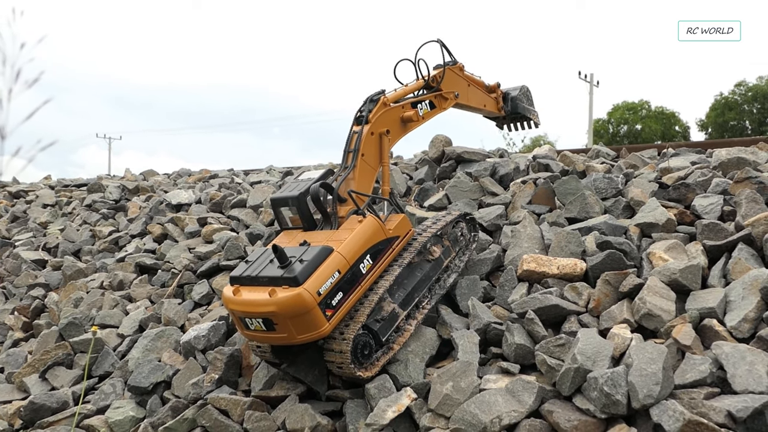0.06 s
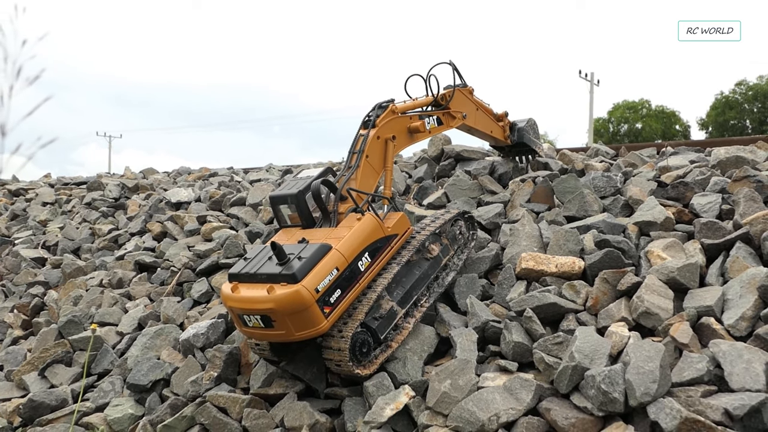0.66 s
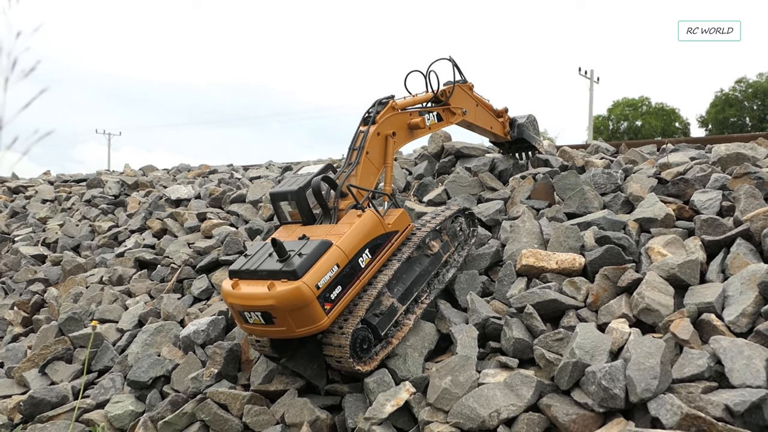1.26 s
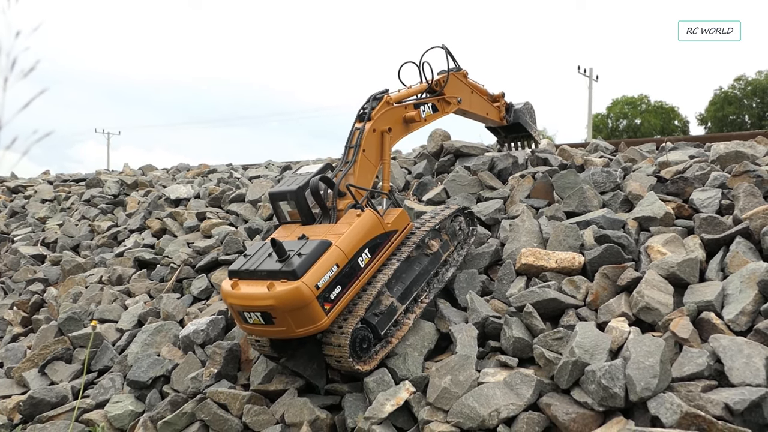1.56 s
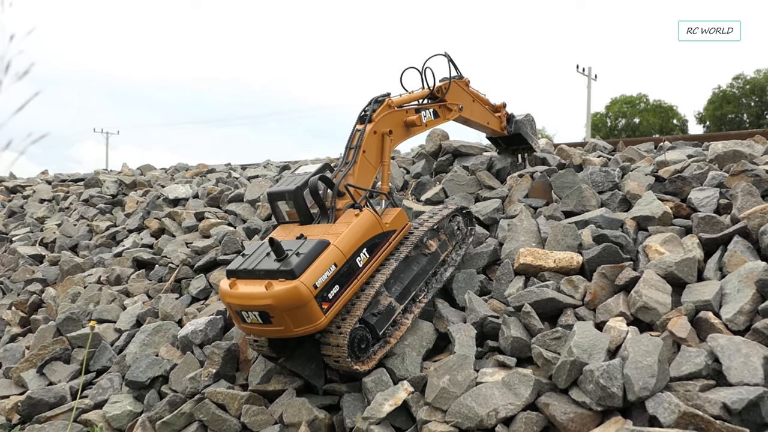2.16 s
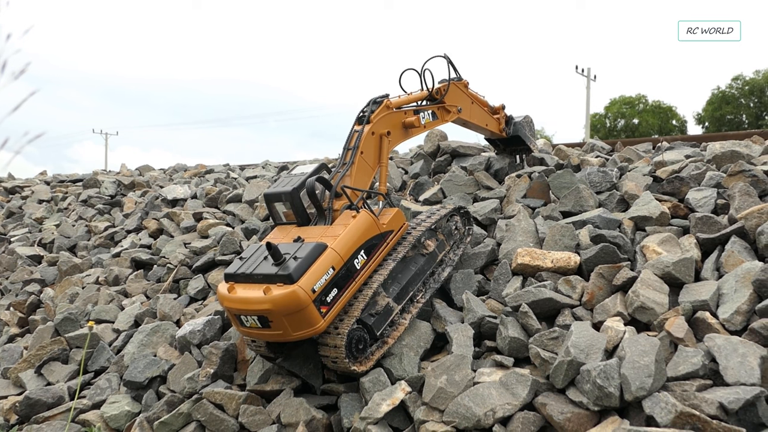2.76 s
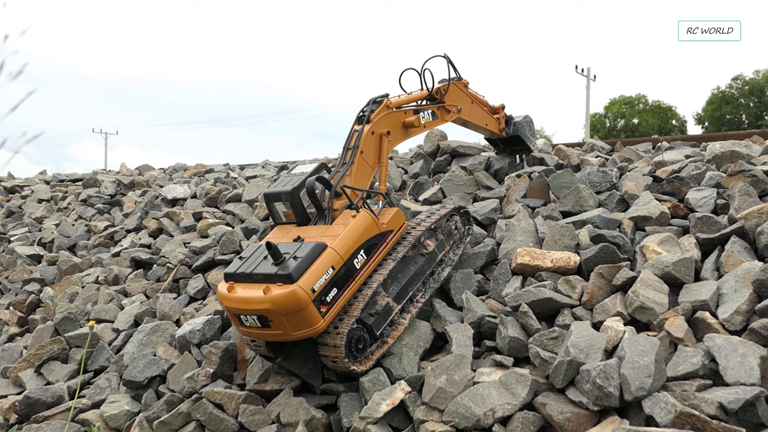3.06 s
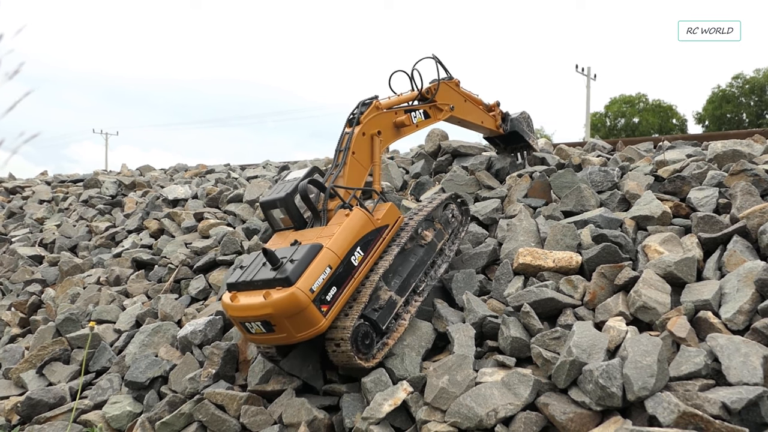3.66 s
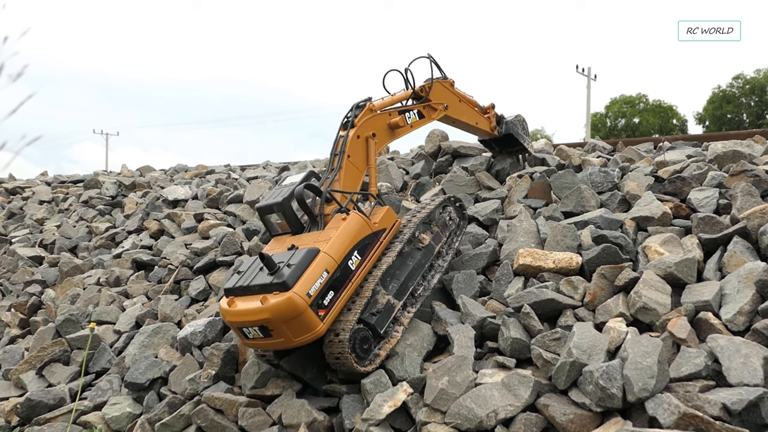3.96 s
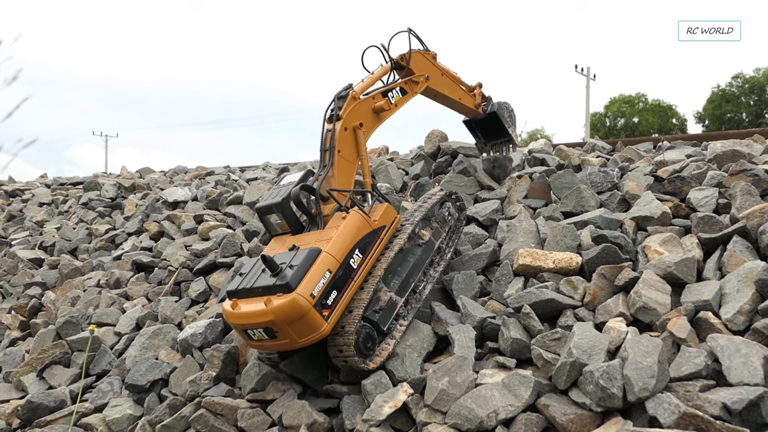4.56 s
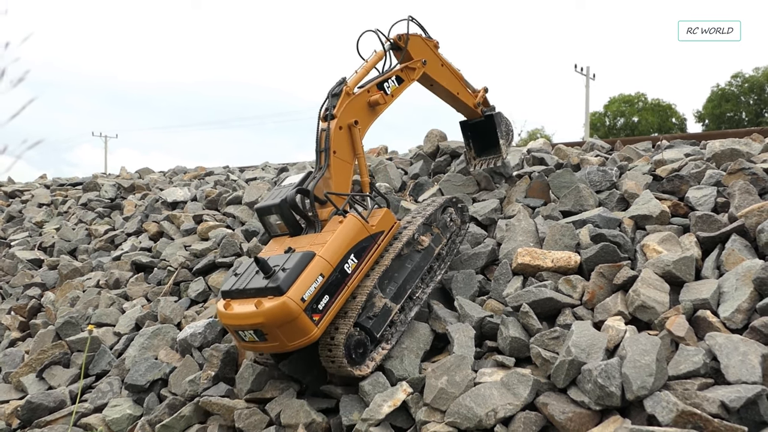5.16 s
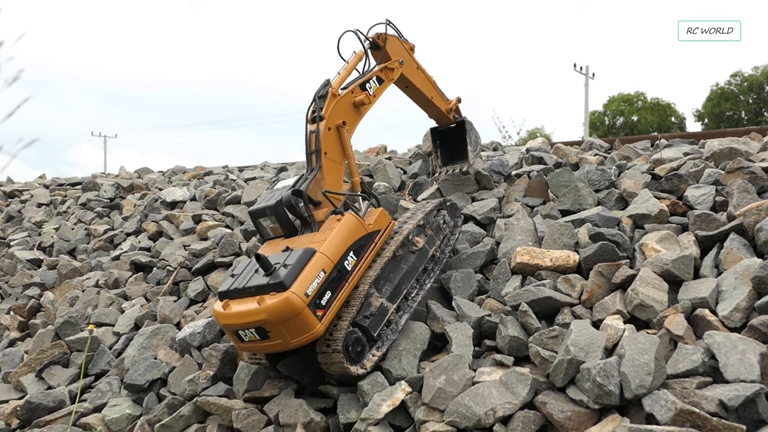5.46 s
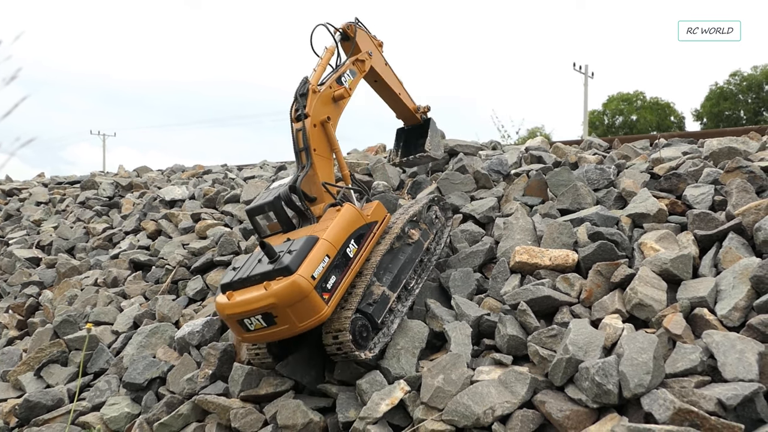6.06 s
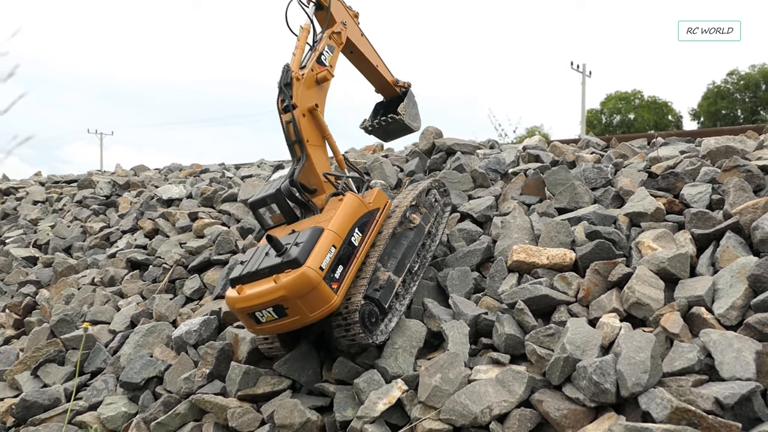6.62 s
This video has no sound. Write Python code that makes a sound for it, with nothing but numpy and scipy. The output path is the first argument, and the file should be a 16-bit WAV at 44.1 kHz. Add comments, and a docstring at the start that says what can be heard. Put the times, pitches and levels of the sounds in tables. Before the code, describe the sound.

A radio-controlled toy digger works on loose stones outdoors, close to the microphone. Its small arm motor whirs with a smooth hum and gear rattle until about 0.7 seconds, stopping with a light metallic ping. A rougher motor burst comes from 1.3 to 1.6 seconds, and another smooth whir from 2 to 2.6. Dry clicks and knocks fall between, clearest near 2.3 and 3.2 seconds. At 3.3 seconds the track motors start with a higher whine and bright rattle. From 3.9 the lifting motor joins with a hoarse growl and thin metallic scrape, both running until about 6.8 seconds. Track links clatter unevenly over the stones, a loose steel part pings between 4 and 5 seconds, and sharp cracks stand out at 4.8, 5.4 and 5.8. Behind are a soft distant traffic rumble, light wind puffs and, in the first three seconds, faint bird chirps and thin whistles.

```python
"""A radio-controlled toy digger climbs a bank of loose stones outdoors, close to the microphone.
Its arm and boom (the big lifting beam) move in three short bursts; then both track motors start and
the boom joins them. Each motor hums as its shaft spins and rattles as its gear teeth strike.
Track links clatter, joints and stones knock, and a loose steel part pings.
Behind it are faint whistles, small far-off birds, puffs of wind and distant traffic."""
import sys
import numpy as np
from scipy import signal
from scipy.fft import rfft, irfft, next_fast_len
from scipy.io import wavfile
from scipy.ndimage import uniform_filter1d, map_coordinates

SR = 44100
rng = np.random.default_rng(int(sys.argv[2]) if len(sys.argv) > 2 else 0)


def wav_record(signal):
    """Record a signal, one row per channel, as 16-bit PCM in the file named by sys.argv[1]."""
    frames = np.transpose(np.atleast_2d(signal))
    bounded = np.clip(frames, -1, 1)
    # unit amplitude maps onto the largest positive 16-bit level
    quanta = np.round(bounded * 32767).astype(np.int16)
    wavfile.write(sys.argv[1], SR, quanta)


N = 299439
T = np.arange(N) / SR


def amp(db):
    """Turn decibels into a number to multiply a sound by."""
    return 10 ** (np.asarray(db) / 20)


def unit(x):
    """Scale a signal to an average strength (rms) of 1."""
    return x / np.sqrt(np.mean(x ** 2))


def switch(start_s, end_s, soften_samples=90):
    """A gate: 1 between two times and 0 outside, with soft edges."""
    return uniform_filter1d(((T >= start_s) & (T <= end_s)) * 1., size=soften_samples)


def curves(rows):
    """Give a gate that is open while the rows last, then each column joined by straight lines."""
    times, *columns = np.transpose(rows)
    return [switch(times[0], times[-1])] + [np.interp(T, times, column) for column in columns]


def swells(rows):
    """A smooth rise and fall for each row of middle_s, length_s, level_db."""
    return sum(amp(db) * np.exp(-(2 * (T - middle_s) / length_s) ** 2) for middle_s, length_s, db in rows)


def die_away(t, ring_s):
    """A fade that drops 60 dB in ring_s seconds."""
    return np.exp(-np.log(1000) * t / ring_s)


def gain_at(hz, tone):
    """Read the gain at any pitch from a tone curve: rows of pitch_hz, level_db."""
    pitches, levels = np.transpose(tone)
    return amp(np.interp(np.log(hz + 1), np.log(pitches), levels))


def colour(x, tone):
    """Make each pitch in a sound louder or softer to follow a tone curve."""
    size = next_fast_len(N + SR // 10)
    return irfft(rfft(x, size) * gain_at(np.fft.rfftfreq(size, 1 / SR), tone), size)[:N]


def band(x, hz, width_hz):
    """Let through the sound near one pitch, as a ringing object does."""
    return signal.lfilter(*signal.iirpeak(min(hz, SR / 2 - 1), hz / min(width_hz, SR / 4), fs=SR), x)


def resonate(x, notes):
    """Ring several notes at once: rows of pitch_hz, width_hz, level_db."""
    return sum(amp(db) * band(x, hz, width_hz) for hz, width_hz, db in notes)


def wander(per_s):
    """A smooth random wobble of typical size 1 that changes about per_s times a second."""
    steps = rng.standard_normal(N // 20)[:int(N / SR * per_s) + 2]
    return unit(map_coordinates(steps, [T * per_s], order=2, mode="nearest"))


def add(out, start_s, sound):
    """Mix a short sound in at its start time."""
    i = max(int(start_s * SR), 0)
    out[i:i + len(sound)] += sound[:N - i]


# The tone of open air with far traffic: pitch_hz, relative_db
AIR_TONE = [(25, -36), (60, -23.5), (95, -3.5), (124, 1), (160, -4), (230, -8), (400, -9.5), (800, -17),
            (1400, -24), (3200, -29), (6500, -34.5), (9000, -38.5), (15000, -47)]
def air(level_db=-44.5, waver_db=0.97, side_db=-1.0):
    """Open air and far traffic make a wide, softly wavering rumble."""
    middle, side = (unit(colour(rng.standard_normal(N), AIR_TONE))
                    * amp(level_db + waver_db * wander(4.5)) for _ in range(2))
    return middle + amp(side_db) * np.array([side, -side])


# Puffs of wind: middle_s, length_s, level_db
GUSTS = [(.33, 0.6, -42), (3.802, 0.37, -38), (4.002, 0.28, -45), (6.13, 0.25, -41), (6.63, .2, -41)]
def breeze():
    """Wind rumbles on the left and right microphone openings separately."""
    tone = [(25, -42), (80, 1), (170, 3.5), (300, -7), (700, -27), (3000, -60)]
    return swells(GUSTS) * np.array([unit(colour(rng.standard_normal(N), tone)) for _ in range(2)])


# Bird chirps: start_s, length_s, start_hz, end_hz, relative_db
CHIRPS = [(.765, 0.02, 3600, 2600, -40), (0.811, 0.034, 3600, 2580, -43), (0.793, 0.026, 5200, 7150, -44),
          (1.74, 0.039, 5900, 7100, -46), (1.825, 0.036, 5500, 6700, -47), (1.91, 0.036, 5900, 6600, -45),
          (2.87, .03, 6700, 7400, -53), (2.954, 0.032, 5400, 7000, -43), (3, 0.092, 6450, 6250, -49)]
def birds(waver=0.03, gain_db=-7):
    """Small far-off birds sing thin, gliding chirps with a quick quaver."""
    out = np.zeros(N)
    quaver = 1 + waver * wander(250)
    for start_s, length_s, start_hz, end_hz, db in CHIRPS:
        glide_hz = np.linspace(start_hz, end_hz, int(length_s * SR))
        hz = glide_hz * np.roll(quaver, -int(start_s * SR))[:len(glide_hz)]
        chirp = np.hanning(len(hz)) * np.sin(2 * np.pi * np.cumsum(hz) / SR)
        add(out, start_s, amp(db + gain_db) * chirp)
    return out


# Thin whistles: start_s, end_s, pitch_hz, level_db
WHISTLES = [(0, .7, 14298, -63), (1.29, 1.68, 14298, -55), (2.03, 2.2, 14298, -54), (2.75, 2.87, 1520, -61),
            (3.08, 3.23, 1520, -57)]
def whistles():
    """Faint, steady tones fade in and out."""
    return sum(amp(db) * switch(start_s, end_s, soften_samples=2000) * np.sin(2 * np.pi * hz * T)
               for start_s, end_s, hz, db in WHISTLES)


# How strongly the stones bounce sound sideways: pitch_hz, gain_db
STONE_SCATTER = [(200, -10), (350, -25), (430, -25), (650, -9), (1000, -12), (1600, -19), (2500, -17),
                 (3400, -10), (5600, -17), (15000, -16)]
def stone_echoes(x, decay_s=0.0068, drift_rad=1.6):
    """Many tiny echoes off the stones make the digger sound wide; they shift as it rocks."""
    t = T[:SR // 20]
    echoes = rfft(rng.standard_normal(len(t)) * np.exp(-t / decay_s), 2 * N)
    smeared = irfft(rfft(x, 2 * N) * echoes / np.abs(echoes))[:N]  # changes timing, not tone
    side = colour(smeared, STONE_SCATTER)
    drift = np.exp(1j * drift_rad * wander(8))
    side = np.real(signal.hilbert(side, next_fast_len(N))[:N] * drift)
    return x + np.array([side, -side])


# The notes of a loose steel part: pitch_hz, relative_db, ring_s
STEEL_NOTES = [(1333, 5, 0.32), (2939, -27, 0.34), (3680, -25, 0.36)]
# Jolts that shake it: start_s, gain_db
JOLTS = [(0.728, -29.5), (1.633, -44), (2.266, -28.5), (4.05, -26.5), (4.34, -29), (4.8, -28)]
def steel_pings():
    """Each jolt makes the loose steel part tick and ring with the same notes."""
    out, t = np.zeros(N), T[:SR // 2]
    ring = sum(amp(db) * np.sin(2 * np.pi * hz * t) * die_away(t, ring_s)
               for hz, db, ring_s in STEEL_NOTES)
    tick = amp(-19) * band(rng.standard_normal(len(t)), 2000, 3000) * np.exp(-t / 0.0038)
    for start_s, db in JOLTS:
        add(out, start_s, amp(db) * (ring + tick))
    return out


# Knocks of joints and stones: start_s, peak_db, pitch_hz, ring_s
KNOCKS = [(1.251, -34, 1800, 0.039), (1.74, -35.5, 2780, .02), (1.81, -40.5, 750, 0.022),
          (1.993, -35.5, 3040, .02), (1.994, -27.5, 1010, 0.034), (2.267, -18, 1240, 0.029),
          (2.809, -40, 2400, .03), (3.077, -36, 2870, 0.026), (3.219, -22.5, 820, 0.025),
          (3.22, -30, 5000, 0.017), (3.2502, -25, 4700, 0.011), (3.2502, -18.5, 3160, 0.022),
          (3.329, -36, 4970, .04), (4.785, -9, 4158, 0.034), (4.848, -23, 2464, 0.016),
          (5.3793, -8, 2180, 0.014), (5.774, -7.5, 2815, 0.02)]
def knocks(snap_db=-17):
    """Joints and stones give short, dry cracks: a bright snap plus a body with its own pitch."""
    out, t = np.zeros(N), T[:SR // 10]
    for start_s, peak_db, hz, ring_s in KNOCKS:
        blow = rng.standard_normal(len(t)) * die_away(t, ring_s)
        body = band(blow, hz, width_hz=.4 * hz)
        snap = band(band(blow, 2400, 3300), 2400, 3300)
        crack = body + amp(snap_db) * snap
        add(out, start_s, amp(peak_db) * crack / np.abs(crack).max())
    return out


# Notes that the track links ring in the hollow body: pitch_hz, width_hz, relative_db
LINK_NOTES = [(343, 24, -15), (491, 70, 6), (529, 55, -2.5)]
# Louder clatter as the tracks lurch over a stone: middle_s, length_s, level_db
LURCHES = [(3.77, .16, -37), (3.9, 0.05, -40), (4.03, 0.078, -40), (4.29, 0.071, -31.5), (4.65, .09, -35.5),
           (4.82, 0.18, -33), (5.08, 0.17, -34), (5.37, 0.059, -37), (5.53, 0.15, -32.5), (5.72, 0.13, -34),
           (5.93, 0.048, -43), (6.1, .08, -35)]
def track_links(blows_per_s=260, crawl_db=-43.5):
    """Track links drop on the stones at random and knock in the digger's hollow body."""
    gate, *_ = motor_run(TRACK_RUNS[0], TRACK_LOADS[0], **TRACK_START_STOP)
    blows = (rng.random(N) < blows_per_s / SR) * np.sign(rng.standard_normal(N))
    tone = [(150, -0.5), (310, 4), (560, -8.0), (700, -15), (2000, -30)]
    knocking = colour(resonate(blows, LINK_NOTES), tone)
    return gate * (amp(crawl_db) + swells(LURCHES)) * unit(knocking)


def panels(x, decay_s=0.0095, ring_db=-7):
    """The plastic and metal panels ring on briefly with countless weak notes."""
    t = T[:SR // 12]
    ring = rng.standard_normal(len(t)) * np.exp(-t / decay_s)
    return x + amp(ring_db) * signal.fftconvolve(x, ring / np.linalg.norm(ring))[:N]


# Notes of the shell that every gearbox rings: pitch_hz, width_hz, gain_db
SHELL_NOTES = [(735, 89, 4), (1427, 67, -2), (1726, 190, 1), (1977, 80, 1), (2362, 55, -2.5),
               (2735, 28, -18), (2950, 88, -9), (4600, 76, -13), (4530, 100, -11), (5370, 83, -4),
               (5740, 40, -28), (6100, 81, -4.5), (6490, 190, -4.5), (7670, 175, -1), (9400, 260, -5.5),
               (10480, 220, -8), (11400, 390, -1.5), (12400, 400, -2.5), (13800, 500, -5)]
def gear_rattle(shaft_hz, tone, uneven_db, swing_db, chatter_db, slide_db, teeth=16):
    """Each gear tooth strikes with its own force, then slides; the shell and panels ring along."""
    turns = np.cumsum(shaft_hz * (1 + .02 * wander(400))) / SR
    tooth_meets = np.diff(np.floor(teeth * turns), prepend=0)
    strikes = tooth_meets * rng.standard_normal(N) * amp(uneven_db * rng.standard_normal(N))
    strikes /= np.sqrt(teeth * shaft_hz / SR)  # slow teeth strike seldom but hard
    force = unit(strikes) + amp(slide_db) * rng.standard_normal(N)
    # The force swings with each turn and chatters because the teeth have some slack.
    force *= amp(swing_db * np.sin(2 * np.pi * turns) + chatter_db * wander(130))
    ringing = panels(force + resonate(force, SHELL_NOTES))
    return unit(colour(ringing, tone))


# How well the digger's body gives off a motor tone: pitch_hz, gain_db
BODY_TONE = [(100, -38), (220, -27), (265, -13), (330, -7), (430, 3), (560, 2), (690, -6.5), (780, 14.5),
             (930, 0.5), (1050, -1.5), (3000, -18.5)]
def motor_hum(shaft_hz, harmonics, flutter, rough_db):
    """An off-balance rotor with three magnetic poles shakes the body at multiples of its speed."""
    turns = np.cumsum(shaft_hz * (1 + flutter * wander(70))) / SR
    return sum(amp(db + rough_db * wander(50)) * gain_at(multiple * shaft_hz, BODY_TONE)
               * np.sin(2 * np.pi * multiple * turns) for multiple, db in harmonics)


def motor_run(run, load, spin_up_s, ease, brake_s, slow_hum_db, slow_gear_db, kick_db, fade_db_per_s):
    """A motor speeds up, bears its load and brakes. Gives gate, shaft_hz, hum_db and rattle_db."""
    kick_s, run_down_s, slowest_share, rattle_db_per_hz = 0.013, 0.1, .1, 0.0922
    on_s, off_s, first_db, last_db = run
    _, full_hz, hum_db = curves(load)
    slowed_hz = np.mean(np.transpose(load)[1]) - full_hz
    # A load that slows the shaft presses the teeth harder.
    rattle_db = np.interp(T, [on_s, off_s], [first_db, last_db]) + rattle_db_per_hz * slowed_hz
    lag = np.exp(-(np.maximum(T - on_s, 0) / spin_up_s) ** ease)  # ease 1 is full push at once
    since_off_s = np.clip(T - off_s, 0, run_down_s)
    speed_share = np.maximum((1 - lag) * (1 - since_off_s / brake_s), slowest_share)
    jolt_db = kick_db * np.minimum(since_off_s / kick_s, 1)  # braking teeth cross their slack
    fade_db = fade_db_per_s * np.maximum(since_off_s - kick_s, 0)
    hum_db = hum_db + slow_hum_db * lag - fade_db
    rattle_db = rattle_db + slow_gear_db * lag + jolt_db - fade_db
    return switch(on_s, off_s + run_down_s), full_hz * speed_share, hum_db, rattle_db


def geared_motor(runs, loads, start_stop, harmonics, gear_tone, flutter, rough_db, **gear_settings):
    """A motor hums and rattles its gearbox during each of its runs."""
    each_run = np.array([motor_run(run, load, **start_stop) for run, load in zip(runs, loads)])
    gates, *columns = each_run.swapaxes(0, 1)
    current_run = np.argmax(gates, axis=0)
    shaft_hz, hum_db, rattle_db = (np.choose(current_run, column) for column in columns)
    hum = np.sqrt(2) * amp(hum_db) * motor_hum(shaft_hz, harmonics, flutter, rough_db)
    rattle = amp(rattle_db) * gear_rattle(shaft_hz, gear_tone, **gear_settings)
    return gates.sum(axis=0) * (hum + rattle)


# The scrape of the gears, moving with the strain: time_s, pitch_hz, level_db
GEAR_STRAIN = [(3.87, 4936, -36), (4.51, 4710, -39), (5.14, 5100, -36), (5.6, 4867, -41), (6.79, 4700, -40)]
def straining_gears(width_hz=330):
    """Hard-pressed teeth scrape with a narrow, metallic hiss."""
    gate, hz, db = curves(GEAR_STRAIN)
    noise = rng.standard_normal(N) + 1j * rng.standard_normal(N)
    slow_noise = signal.sosfilt(signal.butter(2, width_hz / 2, fs=SR, output="sos"), noise)
    scrape = np.real(slow_noise * np.exp(2j * np.pi * np.cumsum(hz) / SR))  # lifted to its pitch
    return gate * amp(db) * unit(scrape)


def boom_shudder(gain_db=-5):
    """In the boom's first run, slack in its screw drive rattles the body's low notes."""
    gate, _, hum_db, _ = motor_run(BOOM_RUNS[0], BOOM_LOADS[0], **BOOM_START_STOP)
    shake = resonate(rng.standard_normal(N), [(372.5, 16, -0.14), (466, 10.0, -0.86)])
    return gate * amp(hum_db + gain_db) * unit(band(shake, 360, 220))


def boom_hoarseness(gain_db=-3):
    """As the boom heaves the digger along, its motor rocks in its mount and the hum turns hoarse."""
    gate, shaft_hz, hum_db, _ = motor_run(BOOM_RUNS[1], BOOM_LOADS[1], **BOOM_START_STOP)
    phase = 2 * np.pi * np.cumsum(shaft_hz) / SR
    rocking = wander(70) * np.sin(phase) + wander(70) * np.cos(phase)
    return gate * amp(hum_db + gain_db) * rocking


def far_track_motor(speed_share=0.95, gain_db=-14):
    """The other track's motor turns a little slower, so it hums a little lower."""
    gate, shaft_hz, _, rattle_db = motor_run(TRACK_RUNS[0], TRACK_LOADS[0], **TRACK_START_STOP)
    harmonics = [(1, -0.5), (2, -18), (3, 1.5), (6, 2.5), (7, 11)]
    hum = motor_hum(shaft_hz * speed_share, harmonics, flutter=0.0038, rough_db=-4)
    return gate * amp(rattle_db + gain_db) * hum


# When the arm motor is on: on_s, off_s, first_rattle_db, last_rattle_db
ARM_RUNS = [(-.3, .668, -26.3, -27), (2.034, 2.632, -28, -27.5)]
# How it bears its load, one list a run: time_s, shaft_hz, hum_gain_db
ARM_LOADS = [
    [(0.02, 354.2, -22), (0.266, 354, -22), (0.65, 354, -22.5)],
    [(2.14, 343, -20), (2.198, 353.6, -22.5), (2.32, 353.4, -23), (2.45, 365.1, -21.5),
     (2.62, 365.6, -21.5)],
]
# The tones in its hum: multiple_of_shaft_speed, relative_db
ARM_HARMONICS = [(1, 3.5), (2, -18), (3, -16), (4, -10.5), (5, -20), (7, -15), (15, -42), (16, -44)]
# The tone of its gearbox: pitch_hz, relative_db
ARM_GEAR_TONE = [(470, -17.5), (800, -16.5), (1060, 3), (1150, -3), (1420, -1.5), (1840, -2.5),
                 (2210, -6.5), (2410, -3.5), (2630, -5.5), (4650, -4), (6190, -6.5), (8440, -17),
                 (12600, -25), (15500, -28)]
ARM_START_STOP = dict(spin_up_s=.036, ease=1.2, brake_s=.072, slow_hum_db=-29, slow_gear_db=-9,
                      kick_db=5, fade_db_per_s=440)
def arm_motor():
    """The arm motor whirs twice with a smooth hum; its gears kick as it brakes."""
    return geared_motor(ARM_RUNS, ARM_LOADS, ARM_START_STOP, ARM_HARMONICS, ARM_GEAR_TONE,
                        flutter=0.0019, rough_db=0.9,
                        uneven_db=1.5, swing_db=1.0, chatter_db=0.58, slide_db=-1.5)


# When the boom motor is on: on_s, off_s, first_rattle_db, last_rattle_db
BOOM_RUNS = [(1.294, 1.62, -23, -22.5), (3.865, 6.8, -23.5, -26)]
# How it bears its load, one list a run: time_s, shaft_hz, hum_gain_db
BOOM_LOADS = [
    [(1.4, 321.2, -32), (1.5, 322.2, -27.5), (1.62, 317, -28.5)],
    [(3.97, 338.4, -30.5), (4.08, 331.7, -32.5), (4.2, 338.2, -31), (4.35, 352.2, -33), (4.8, 349.8, -31.5),
     (5.2, 330, -28), (5.45, 342.2, -35), (5.68, 331.9, -32.5), (6, 346.6, -32.5), (6.3, 328.4, -31.5),
     (6.5, 350.1, -32.5)],
]
# The tones in its hum: multiple_of_shaft_speed, relative_db
BOOM_HARMONICS = [(1, 0), (2, -19), (3, -9), (4, -13), (5, -13), (16, -9), (24, -20)]
# The tone of its gearbox: pitch_hz, relative_db
BOOM_GEAR_TONE = [(350, -25), (600, -15.5), (820, -27), (953, 1.5), (1030, -3), (1450, 2.5), (2220, -7),
                  (2950, -2), (4200, -3), (4940, 0), (6230, -4), (7140, -5.5), (7640, -10.5),
                  (15500, -25.5)]
BOOM_START_STOP = dict(spin_up_s=.04, ease=1.05, brake_s=.08, slow_hum_db=-10, slow_gear_db=-12,
                       kick_db=-3, fade_db_per_s=343)
def boom_motor():
    """The boom motor growls once briefly, then for longer, its pitch moving with the load."""
    return geared_motor(BOOM_RUNS, BOOM_LOADS, BOOM_START_STOP, BOOM_HARMONICS, BOOM_GEAR_TONE,
                        flutter=.007, rough_db=3.5,
                        uneven_db=1.5, swing_db=1.0, chatter_db=1.0, slide_db=1.5)


# When the track motor is on: on_s, off_s, first_rattle_db, last_rattle_db
TRACK_RUNS = [(3.33, 6.8, -26, -24.5)]
# How it bears its load, one list a run: time_s, shaft_hz, hum_gain_db
TRACK_LOADS = [
    [(3.415, 416.1, -22), (3.445, 416, -34), (3.62, 421.4, -24.5), (3.8, 420.5, -25), (4, 404.4, -29),
     (4.3, 414, -25.5), (5.3, 406.2, -26), (5.45, 412, -29.5), (5.85, 409.3, -29.5), (6.07, 410.8, -24.5),
     (6.2, 410.4, -36.5), (6.5, 411.5, -22), (6.8, 414.6, -23)],
]
# The tones in its hum: multiple_of_shaft_speed, relative_db
TRACK_HARMONICS = [(1, -3), (2, -35), (3, -8), (6, -22), (7, -41), (11, -23), (16, -43), (23, -32)]
# The tone of its gearbox: pitch_hz, relative_db
TRACK_GEAR_TONE = [(350, -47), (600, -21.5), (766, -5.5), (1110, -6), (1220, 0), (1340, -4), (1830, -3.5),
                   (2160, -8), (2370, 3), (2640, -1.5), (2870, 0.5), (3820, -3), (4430, 2), (15500, -15.5)]
TRACK_START_STOP = dict(spin_up_s=.1, ease=1.3, brake_s=.08, slow_hum_db=-9.5, slow_gear_db=-16,
                        kick_db=0, fade_db_per_s=340)
def track_motor():
    """The near track's motor drives the climb with a higher hum and a bright gear rattle."""
    return geared_motor(TRACK_RUNS, TRACK_LOADS, TRACK_START_STOP, TRACK_HARMONICS, TRACK_GEAR_TONE,
                        flutter=0.0022, rough_db=2.0,
                        uneven_db=1.0, swing_db=-0.3, chatter_db=0.53, slide_db=1)


def scene():
    """The digger on the stones, in the open air."""
    motors = arm_motor() + boom_motor() + track_motor()
    motors += boom_shudder() + boom_hoarseness() + straining_gears() + far_track_motor()
    close_sounds = motors + track_links() + knocks() + steel_pings() + whistles()
    return stone_echoes(close_sounds) + birds() + air() + breeze()


def record(dry):
    """The camera cuts off the highest treble."""
    top_hz = 15750
    low_pass = signal.firwin(801, top_hz, window=("kaiser", 8), fs=SR)
    return signal.fftconvolve(dry, low_pass[None], mode="same")


dry = scene()
out = record(dry)
wav_record(out)
```